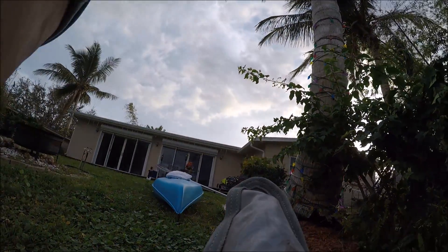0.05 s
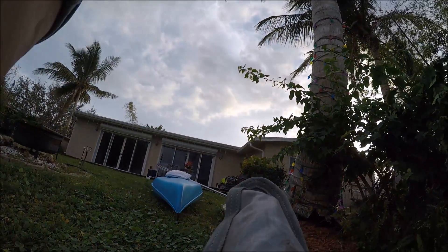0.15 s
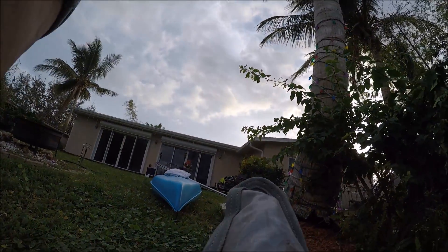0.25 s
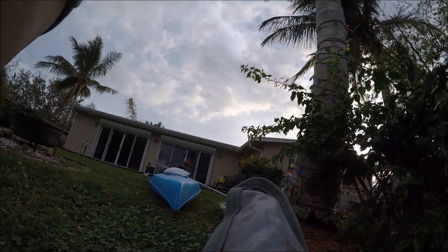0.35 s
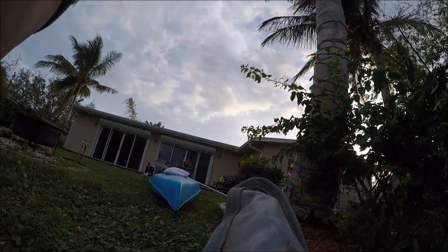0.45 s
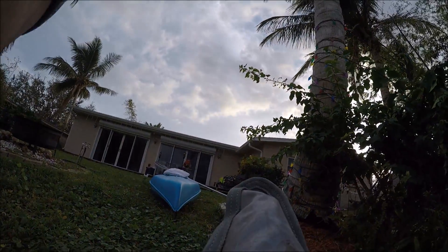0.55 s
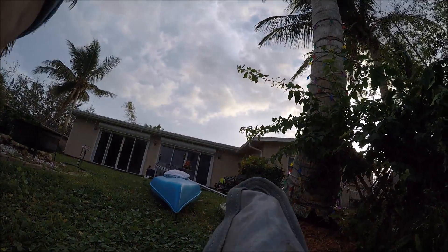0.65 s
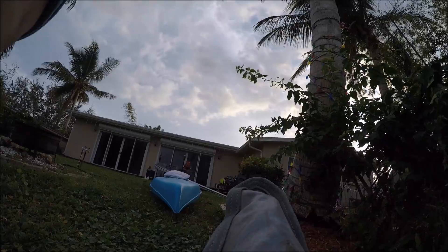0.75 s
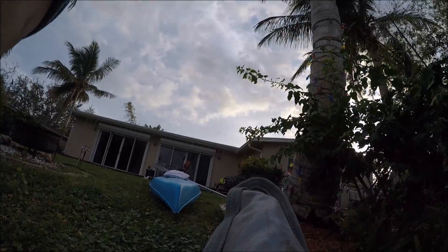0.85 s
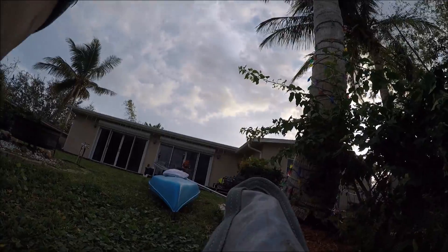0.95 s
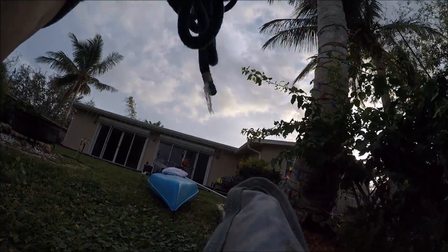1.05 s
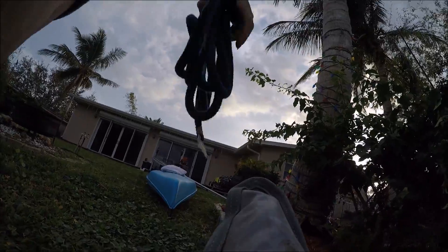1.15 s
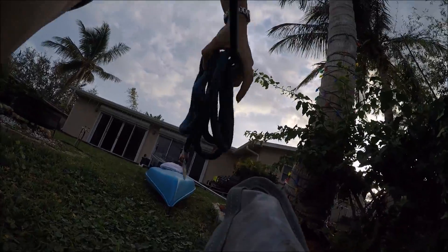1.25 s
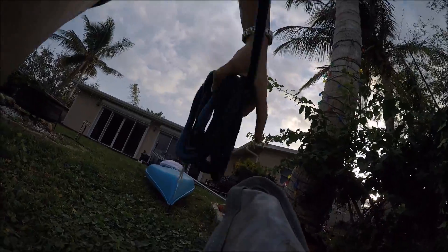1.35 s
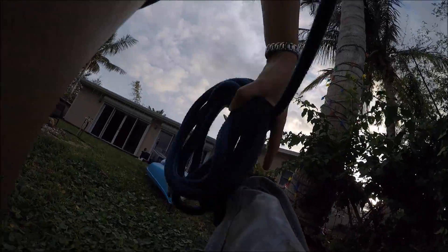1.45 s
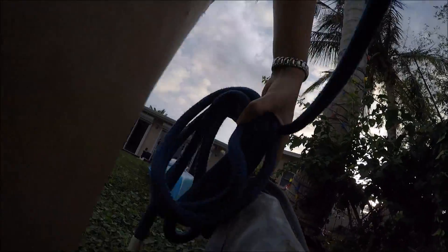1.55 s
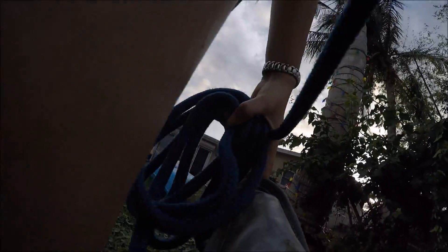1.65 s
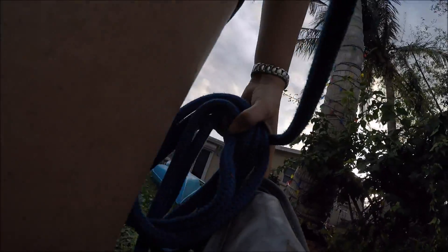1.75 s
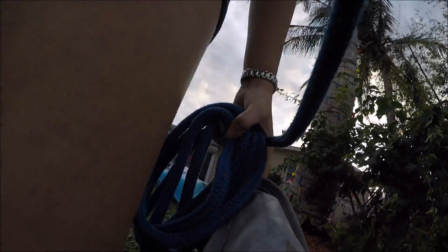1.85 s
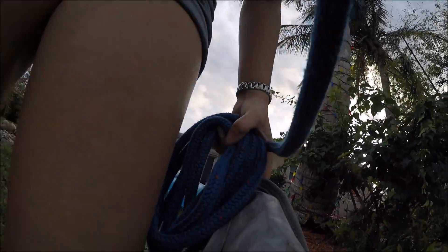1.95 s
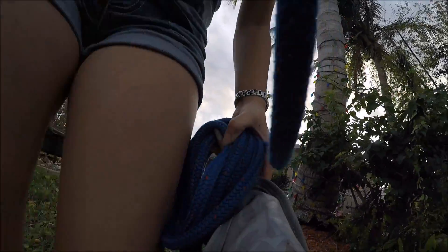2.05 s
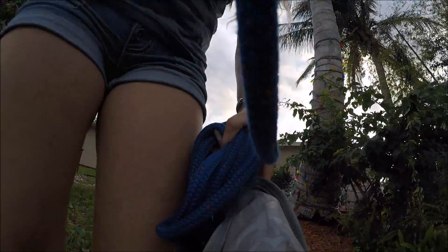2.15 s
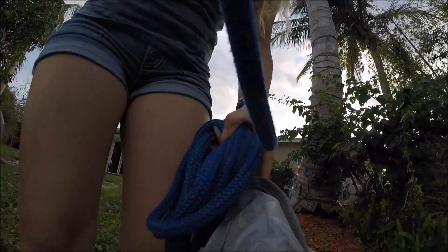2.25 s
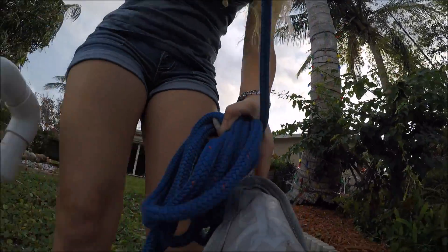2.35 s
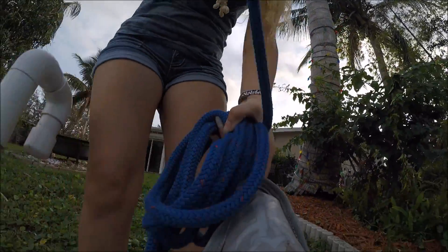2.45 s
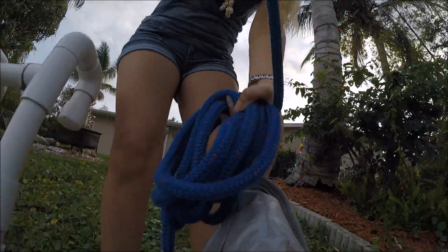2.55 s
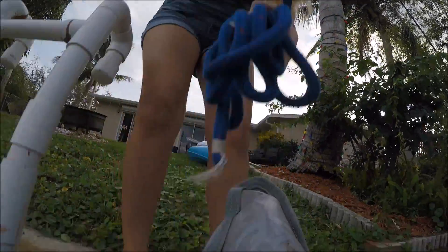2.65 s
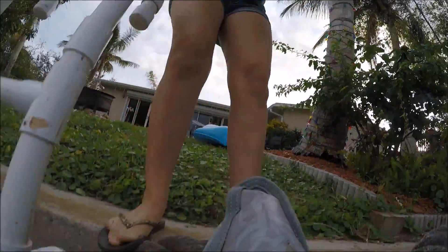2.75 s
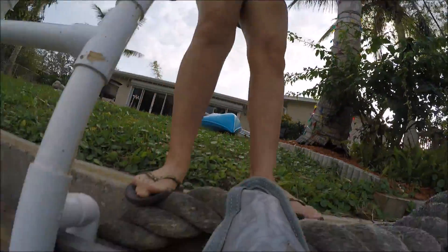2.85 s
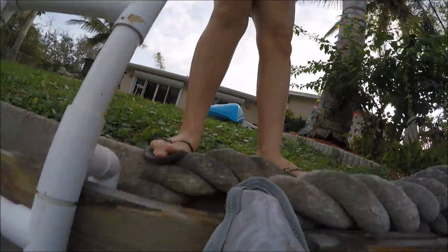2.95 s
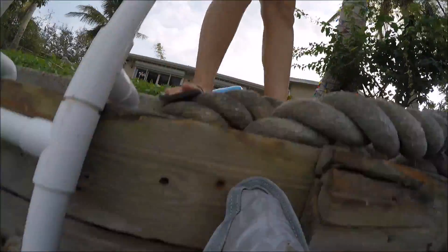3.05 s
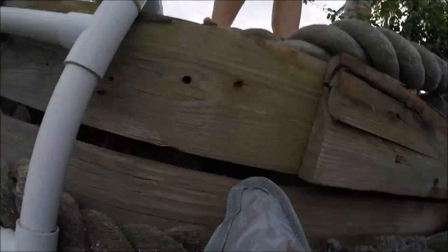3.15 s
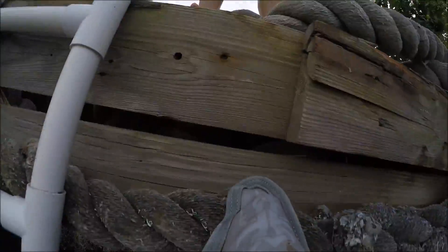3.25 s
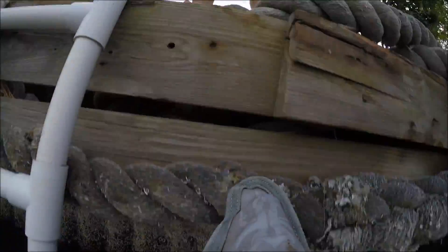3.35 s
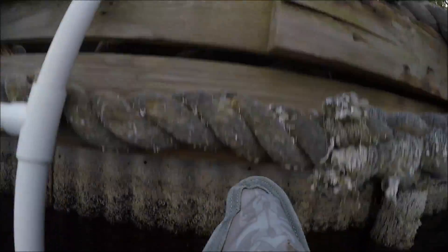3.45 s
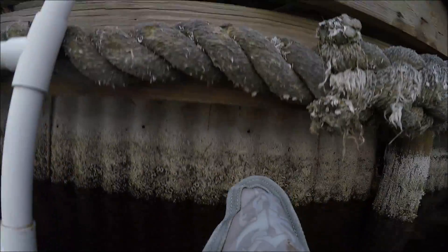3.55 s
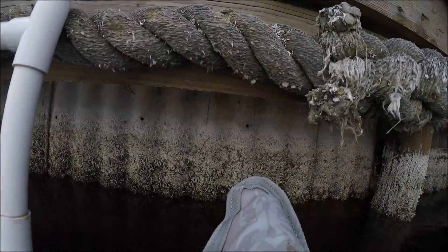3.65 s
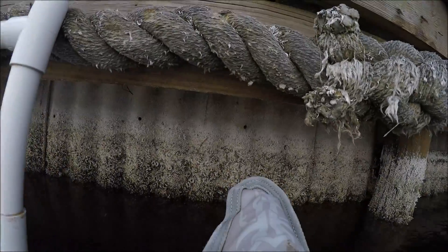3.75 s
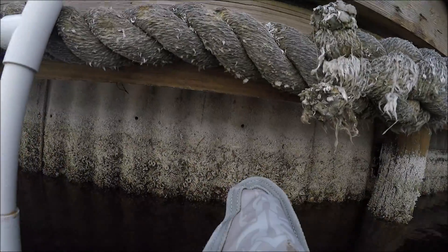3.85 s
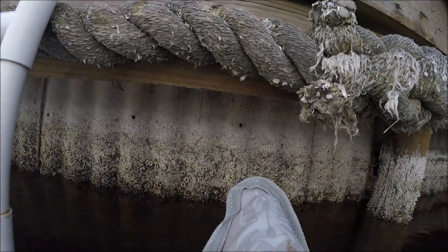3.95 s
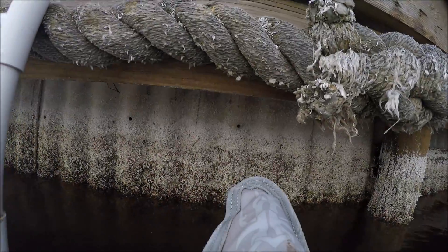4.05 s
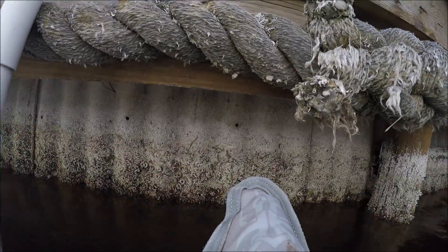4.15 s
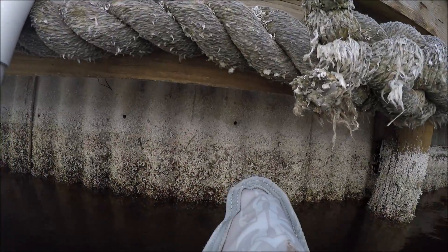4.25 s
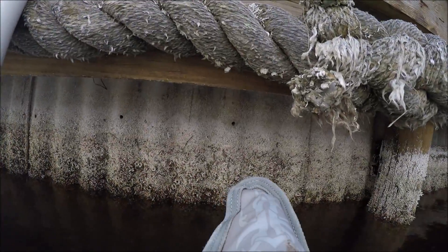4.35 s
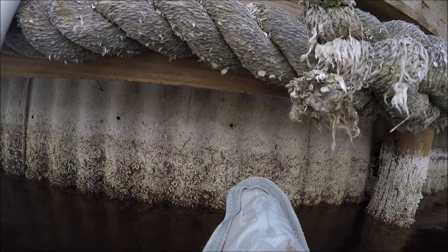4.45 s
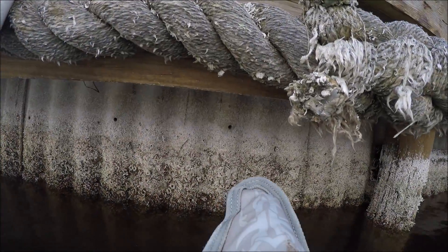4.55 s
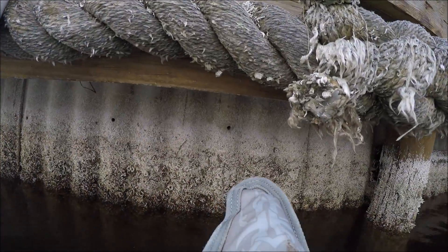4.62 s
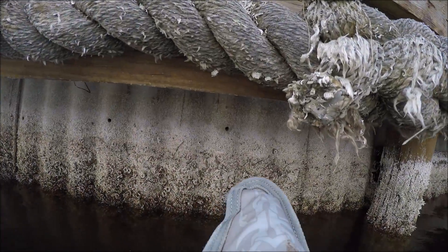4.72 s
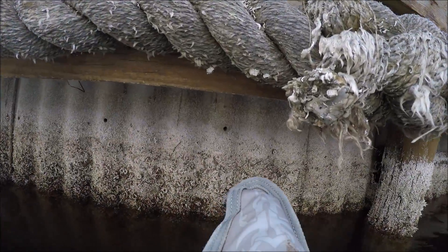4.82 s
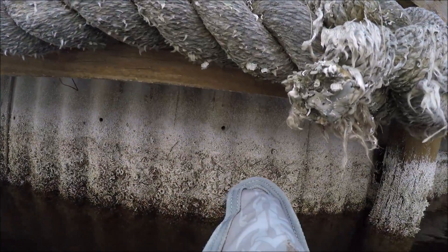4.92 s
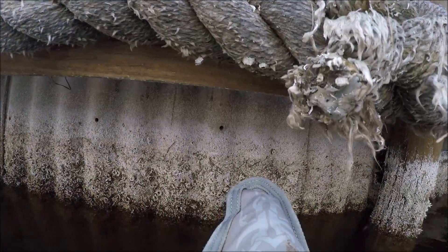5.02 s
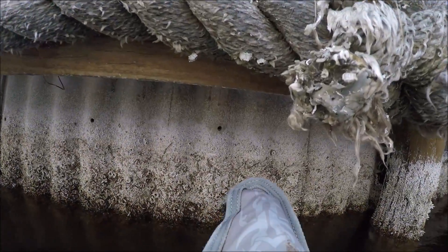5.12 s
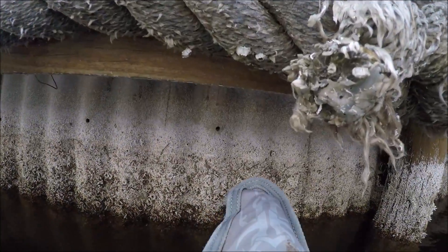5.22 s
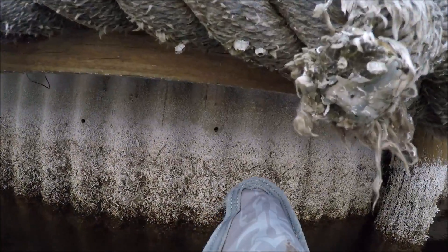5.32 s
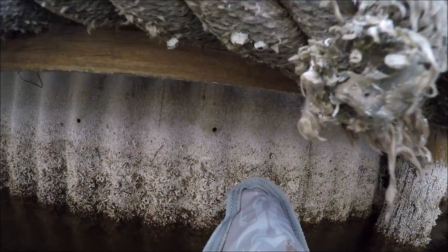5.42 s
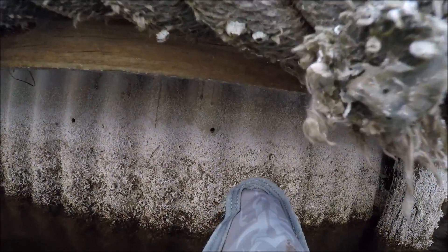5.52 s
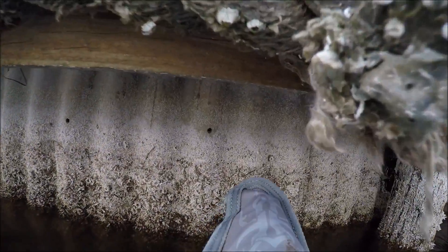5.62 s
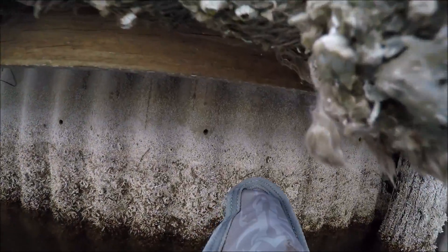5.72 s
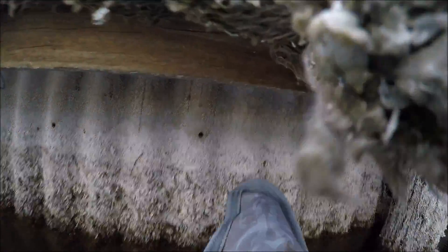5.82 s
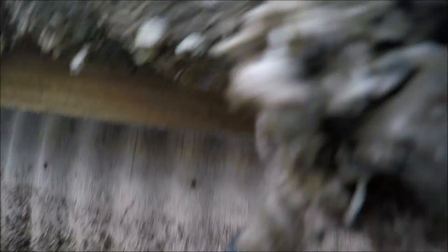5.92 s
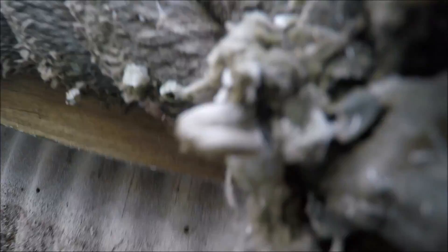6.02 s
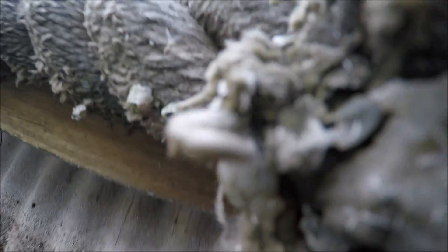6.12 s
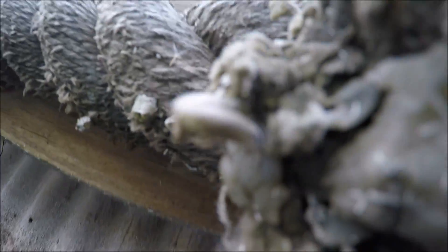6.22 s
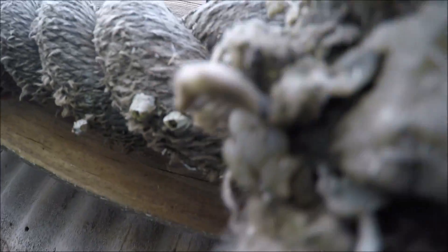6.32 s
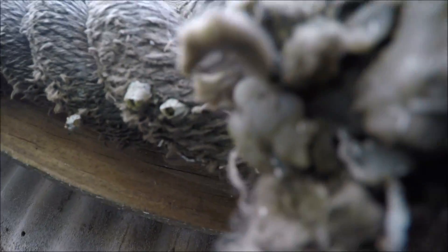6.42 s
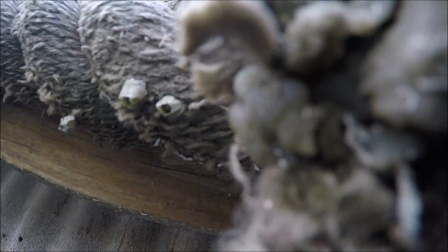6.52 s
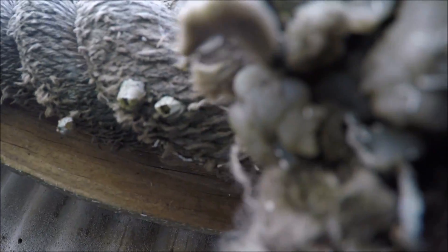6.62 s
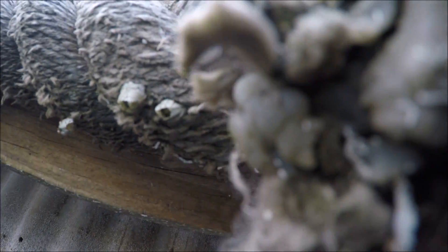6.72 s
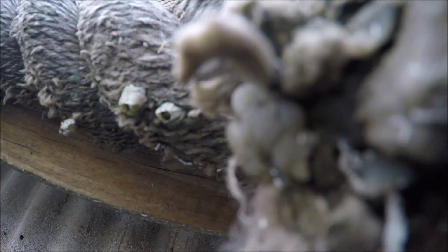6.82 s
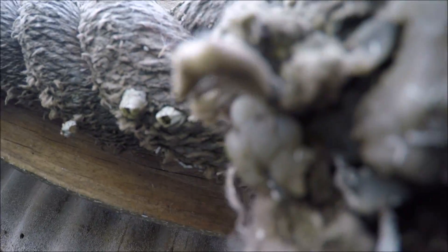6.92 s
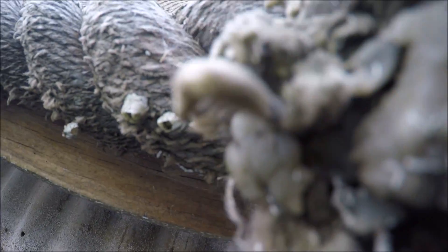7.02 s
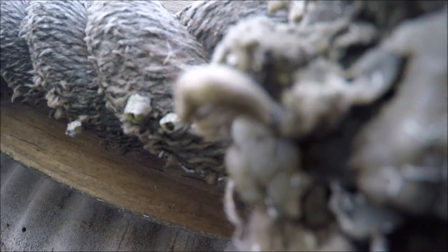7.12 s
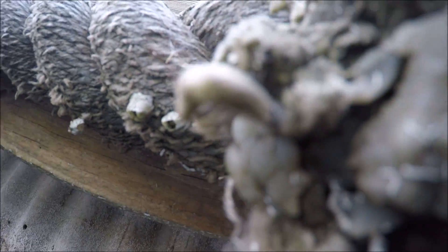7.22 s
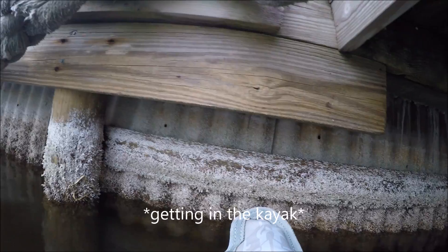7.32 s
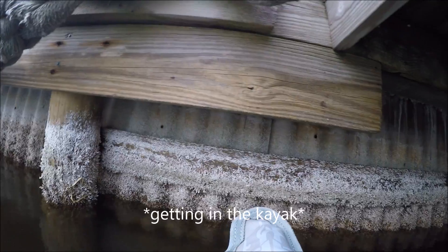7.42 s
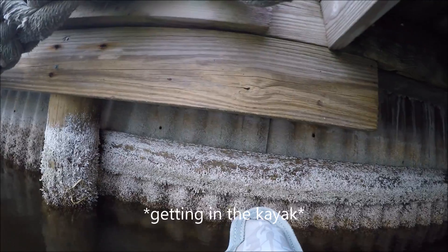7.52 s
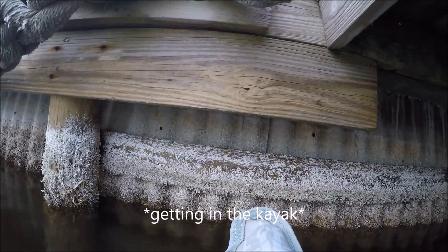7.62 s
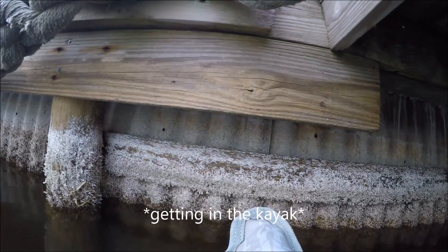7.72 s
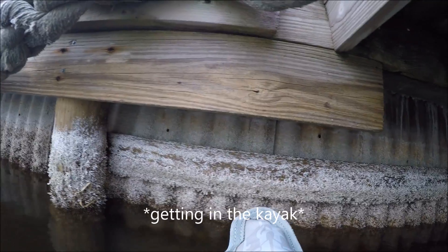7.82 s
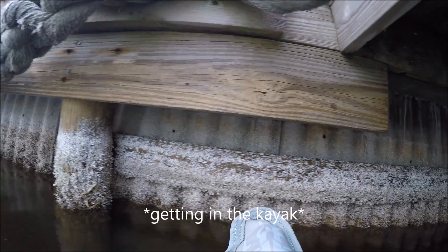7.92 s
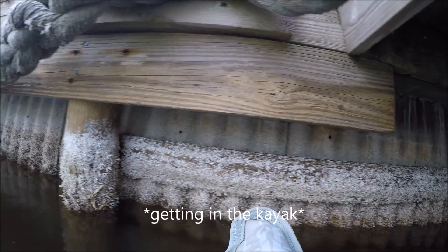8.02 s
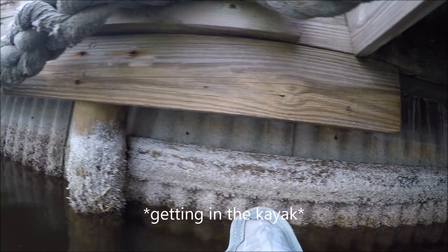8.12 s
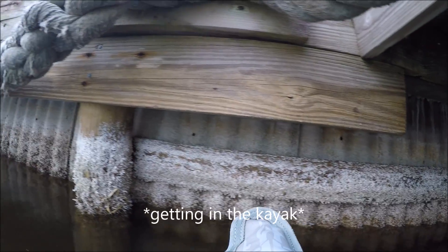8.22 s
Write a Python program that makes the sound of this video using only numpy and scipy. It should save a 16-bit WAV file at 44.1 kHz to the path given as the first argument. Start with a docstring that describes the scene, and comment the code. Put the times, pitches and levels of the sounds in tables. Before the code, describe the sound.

Heard from a camera fixed to a plastic kayak outdoors: faint hiss and low sway, then rope rubbing, hollow thumps, brief groans and squeaks as the hull slides off the bank. A calmer spell brings tiny drips and laps. Then it slams into the dock with heavy booms and sharp clacks, crusted rope and timber scraping the case, before fading to near quiet.

```python
"""A low sway under a quiet hiss comes first; then a plastic kayak slides off a bank and drifts against a wooden dock.
The sound is heard at a camera fixed to its deck: the mount swings, and the hull booms and groans as decaying or
stick-slip tones. Hard contacts clack through the camera's resonant case; rope and crusted timber scrape it as
dense random catches. Ringing bubbles make the few drips and laps, and wet plastic squeaks in rising chirps."""
import sys
import numpy as np
from scipy import signal
from scipy.fft import rfft, irfft
from scipy.io import wavfile

SR = 44100
rng = np.random.default_rng(int(sys.argv[2]) if len(sys.argv) > 2 else 0)


def master(y):
    """Save y as 16-bit WAV."""
    cut = np.clip(np.atleast_2d(y).T, -1, 1)
    pcm = np.round(cut * 32767)  # scale
    wavfile.write(sys.argv[1], SR, pcm.astype(np.int16))


N = 364707
TIME = np.arange(N) / SR   # s
SLOW_TIME = TIME[::20]   # coarse steps suffice for slow pressure changes


def from_db(db):
    """Logarithmic level: decibels to amplitude gain."""
    return 10 ** (np.asarray(db) / 20)


def rms_one(x):
    """Normalization: scale to unit mean power."""
    return x / np.sqrt(np.mean(x ** 2) + 1e-20)


def in_time(rows):
    """Linear interpolation: join the rows of a curve by straight lines."""
    s, *columns = np.transpose(rows)
    return [np.interp(TIME, s, column) for column in columns]


def add(out, s, sound):
    """Superposition: mix a sound in at a given time."""
    start = max(round(s * SR), 0)
    out[start:start + len(sound)] += sound[:N - start]


def band(x, low_hz, high_hz, order=2):
    """Causal band-pass filtering."""
    sos = signal.butter(order, [low_hz, min(high_hz, 0.45 * SR)], "band", fs=SR, output="sos")
    return signal.sosfilt(sos, x)


def coloured(x, spectrum):
    """Spectral shaping: weight a steady sound by a spectrum that falls away past its ends; rms 1."""
    hz, db = np.transpose(spectrum)
    f = np.maximum(np.arange(N // 2 + 1) * SR / N, 1)
    skirts = 1 / (1 + (hz[0] / f) ** 6) / (1 + (f / hz[-1]) ** 6)
    gain = skirts * from_db(np.interp(np.log(f), np.log(hz), db))
    return rms_one(irfft(rfft(x) * gain, N))


def resonate(x, hz, width_hz):
    """Damped resonance: a two-pole mode with gain 1 at its top."""
    r = np.exp(-np.pi * width_hz / SR)
    feed = np.array([1, 0, -1]) * (1 - r * r) / 2
    return signal.lfilter(feed, [1, -2 * r * np.cos(2 * np.pi * hz / SR), r * r], x)


def drift(rate):
    """Slow random fluctuation: interpolated random knots, rate per second, rms 1."""
    knots = rng.standard_normal(int(N / SR * rate) + 2)
    return rms_one(np.interp(TIME * rate, np.arange(len(knots)), knots))


def grains(per_s, spread_db):
    """Random impulse train: tiny catches of a rough surface, of very uneven size; rms 1."""
    sizes = from_db(spread_db * np.minimum(rng.exponential(1, N), 4.5))
    caught = rng.random(N) < per_s / SR
    return rms_one(sizes * rng.standard_normal(N) * caught)


def swell(s, rise_s, fall_s):
    """Loading and release: pressure builds up to a peak of 1 and lets go."""
    shape = 1.48   # 1 = pointed, 2 = bell-shaped
    away = np.abs((SLOW_TIME - s) / np.where(SLOW_TIME < s, rise_s, fall_s))
    return np.exp(-np.minimum(away ** shape, 40))


def strokes(rows):
    """Incoherent addition: gain of a run of strokes whose powers add."""
    power = sum((from_db(db) * swell(s, rise, fall)) ** 2 for s, db, rise, fall, *_ in rows)
    return np.interp(TIME, SLOW_TIME, np.sqrt(power))


def gritty(rows):
    """Proportional excitation: gain of the hard grains that the same strokes drag along."""
    return strokes([(s, db + rel_db, rise, fall) for s, db, rise, fall, rel_db in rows])


def swing(db, hz, rise, t60):
    """Free decay: a low vibration builds up during the push, then dies away exponentially."""
    t = TIME[:SR]
    push = np.sin(np.pi / 2 * np.minimum(t / rise, 1))
    decay = from_db(db - 60 * np.maximum(t - rise, 0) / t60)
    return decay * push * np.sin(2 * np.pi * hz * t)


# resonances of the camera case: pitch_hz, width_hz, level_db
CASE_MODES = [(708, 170, -8.5), (977, 41, -5.5), (1050, 12, -5.5), (1660, 67, 3), (1868, 40, -3),
              (2075, 50, -3), (2275, 210, -4.5), (2496, 51, 1), (2790, 51, -5.5), (3026, 41, -1.5),
              (3400, 20, -8), (4280, 720, 4), (5600, 450, -3), (7610, 85, -7.5)]


def case(x):
    """Modal transmission: vibration reaches the microphone directly and through the ringing case."""
    return 0.7 * x + sum(from_db(db) * resonate(x, hz, width) for hz, width, db in CASE_MODES)


# spectrum of the outdoor hiss: frequency_hz, relative_level_db
AIR_COLOUR = [(200, -1.5), (300, -8.5), (550, -10.5), (1000, -11.5), (1400, -16), (2400, -14.5),
              (3200, -18.5), (5000, -19.5), (8000, -24.5), (12000, -24), (15500, -24)]
# the background dips and recovers: lowest_s, depth_db, sinking_s, recovery_s
AIR_DIPS = [(3.55, 7, 0.17, 0.52), (6.62, 4, 0.25, 0.68)]


def air(level_db=-65):
    """Broadband noise: a quiet outdoor hiss that dips twice."""
    dip_db = sum(db * swell(s, sink, recover) for s, db, sink, recover in AIR_DIPS)
    gain = from_db(level_db - np.interp(TIME, SLOW_TIME, dip_db))
    return gain * coloured(rng.standard_normal(N), AIR_COLOUR)


# how much the boat rocks, before balance: time_s, mount_sway_db, hull_murmur_db
ROCKING = [(0, -42.5, -55.5), (.7, -41.5, -50.5), (.95, -30, -43), (1.25, -39.5, -53.5), (1.6, -36.5, -45),
           (2.0, -31, -59.5), (2.9, -25.5, -30.5), (3.35, -30.5, -44.5), (3.85, -34, -51.5),
           (4.3, -36, -51.5), (5.2, -38, -62), (5.8, -46.5, -59.5), (6.05, -38.5, -37.5), (6.45, -35, -32),
           (6.66, -50, -58), (6.85, -39, -39), (7.25, -35.5, -37.5), (7.5, -42.5, -67.5), (8.27, -62, -65)]
# spectrum of the hull's murmur: frequency_hz, relative_level_db
MURMUR_COLOUR = [(45, 6.5), (70, 7), (120, -4), (150, -4.5), (180, -4), (230, -20), (400, -22.5)]


def rumble(rubbing, scraping, sway_db=1.0, murmur_db=-0.5, rub_drag_db=-11, scrape_drag_db=-23,
           rub_follows=0.69, scrape_follows=0.38, surge_db=3.5, lull_db=3.0):
    """Randomly driven resonance: the mount sways throughout; friction swells the lumpy murmur of the hull."""
    sway, murmur = in_time(ROCKING)
    swaying = signal.hilbert(resonate(rng.standard_normal(N), 33, 3.3))
    evened = swaying.real / np.abs(swaying) ** 0.69   # the swing seldom stalls
    swaying = rms_one(band(evened, 20, 72))
    lumps = coloured(grains(per_s=1500, spread_db=1.2), MURMUR_COLOUR)
    rub_drag = from_db(rub_drag_db) * rubbing ** rub_follows
    scrape_drag = from_db(scrape_drag_db) * scraping ** scrape_follows
    drag = np.hypot(rub_drag, scrape_drag)
    murmuring = np.hypot(from_db(murmur + murmur_db), drag) * from_db(surge_db * drift(25)) * lumps
    return from_db(lull_db * drift(9)) * (from_db(sway + sway_db) * swaying + murmuring)


# jolts that set the camera mount swinging: start_s, height_db, push_s
JOLTS = [(0.343, -14, 0.04), (0.831, -20.5, 0.029), (1.685, -3.5, 0.02), (2.429, -4, 0.033),
         (2.659, -4, 0.045), (2.829, -1.5, .015), (2.904, -6.5, 0.014), (3.11, -3, 0.011),
         (3.215, -2.5, 0.0084), (3.621, -5.5, 0.0055), (3.95, -19, 0.039), (4.221, -23.5, 0.058),
         (5.091, -25, .05)]


def jolts(mount_hz=32.1, mount_t60_s=0.32):
    """Impulse response of an oscillator: each jolt leaves the mount swinging at its own low note."""
    out = np.zeros(N)
    for s, db, push_s in JOLTS:
        add(out, s, swing(db, mount_hz, push_s, mount_t60_s))
    return out


# hard contacts: contact_s, first_5_ms_level_db; before balance: body_over_clack_db, crack_over_clack_db
KNOCKS = [(0.3435, -51.5, 0.5, -3), (1.078, -44.5, -7.5, -6), (1.54, -50, -18, -3), (1.6811, -26, 24, -26),
          (1.686, -37, 5, -16), (2.48, -42.5, 12, -19), (2.677, -26.5, 17, -8), (2.7994, -39, -3, -4),
          (2.825, -30, 10.5, -2), (2.8984, -31, 18, -7), (2.914, -24, -1.5, -7), (3.0695, -38.5, -12, -5.5),
          (3.101, -26.5, 10.5, -11.5), (3.109, -24, 3, -20), (3.1191, -20.5, -2.5, -3),
          (3.137, -27.5, 0.5, -5.5), (3.2117, -28, 5, -10), (3.2293, -25, 2.5, -14), (3.303, -45, -4.5, -4),
          (3.5844, -30.5, -4.5, 1.5), (3.595, -22, 11, -11), (3.611, -29.5, 2, -4), (5.907, -26.5, -7, -8),
          (5.921, -19.5, -11.5, -6), (5.94, -11.5, -6, -20), (5.9445, -15, 11, -19.5),
          (5.9548, -15, 2, -4.5), (6.075, -28.5, 9, -9), (6.167, -27, -2.5, -6), (6.189, -31.5, 4, 2.5),
          (6.21, -27.5, -21, -13), (6.228, -29, 8, -3), (6.432, -26.5, 8.5, -2.5), (6.438, -20, 4.5, -3),
          (7.2273, -44.5, 6, -22)]


def knocks(crunch=0.25, crunch_t60=0.018, lead_noise_db=-9, lead_noise_t60=0.02, tail_db=-30, tail_t60=0.16,
           body_db=3.5, clack_db=1.0, crack_db=-3.5):
    """Impact excitation: a short noise rises just before each sharp knock; a crunch and faint shiver follow."""
    lead, first = SR // 100, SR // 200   # samples: 10 ms before contact, 5 ms after it
    out, t = np.zeros(N), (np.arange(SR // 6) - lead) / SR
    before = from_db(lead_noise_db - 60 * np.abs(t) / lead_noise_t60)
    after = from_db(-60 * np.abs(t) / crunch_t60) + from_db(tail_db - 60 * np.abs(t) / tail_t60)
    noises = rng.standard_normal((len(KNOCKS), len(t)))
    for (s, db, dull, crack), noise in zip(KNOCKS, noises):
        force = (t == 0) + crunch * noise * np.where(t < 0, before, after)
        ringing = case(force)
        # padded contacts favour the wooden body, hard ones the clack and crack of the case
        hollow = resonate(force, 160, 160) + 0.43 * resonate(force, 490, 220)
        body = band(ringing + hollow, 130, 1130, order=3)
        clack = band(ringing, 1330, 2900, order=3)
        sparkle = 0.14 * band(force, 7000, 15000)
        snap = band(band(ringing, 1800, 6600), 3400, 12000, order=3) + sparkle
        shares = from_db([dull + body_db, clack_db, crack + crack_db]) / np.hypot(from_db(dull), 1)
        for part, share in zip((body, clack, snap), shares):
            opening = np.std(part[lead:lead + first])
            add(out, s - lead / SR, from_db(db) * share * part / opening)
    return out


# dull blows on the hull: start_s, height_db, pitch_hz
THUDS = [(.346, -28.5, 86), (.81, -25, 89), (1.07, -38, 176), (1.554, -23, 166), (1.645, -14.5, 38.8),
         (1.682, -10.5, 150.6), (1.682, -21.5, 429), (2.222, -7.5, 45.3), (2.375, -8, 54.5),
         (2.528, -11, 66.3), (2.795, -3.5, 72), (3.02, -15.5, 51.5), (3.118, -16.5, 123),
         (3.415, -13.5, 41.6), (3.595, -13, 144.6), (3.596, -17, 374), (3.596, -4, 49.8),
         (4.33, -35.5, 101), (4.63, -39, 119), (5.224, -25.5, 60.6), (5.909, 4.5, 52), (5.952, 0.5, 70),
         (6.076, -11, 65), (6.234, -7, 36.5), (6.438, 1.5, 83.5), (6.451, -6, 38.8), (6.72, -27, 85),
         (7.233, -11.5, 105), (7.239, -27.5, 184)]


def thuds(rise_cycles=0.45, free_cycles=9.9, pinned_cycles=3.9, pinned_from_s=5.8, pinned_to_s=6.9):
    """Damped modes: the hull booms for a set number of cycles, fewer while the dock holds it."""
    out = np.zeros(N)
    for s, db, hz in THUDS:
        cycles = pinned_cycles if pinned_from_s < s < pinned_to_s else free_cycles   # to fall 60 dB
        add(out, s, swing(db, hz, rise_cycles / hz, cycles / hz))
    return out


# rope and hands rubbing on the boat as it is launched: peak_s, level_db, rise_s, fall_s, relative_sand_db
RUBS = [(.87, -63, 0.043, 0.11, -15), (1.44, -61, 0.17, 0.083, -12), (1.56, -46, 0.01, 0.1, -18),
        (1.68, -45.5, 0.11, 0.14, -20), (1.92, -52.5, .035, 0.043, -17), (2.07, -51.5, 0.068, 0.1, -24),
        (2.24, -51, 0.04, 0.057, -21), (2.327, -41, 0.031, 0.036, -26), (2.415, -36, 0.013, 0.033, -18.5),
        (2.59, -47.5, 0.018, .03, -27), (2.66, -31.5, 0.044, 0.02, -27),
        (2.832, -33.5, 0.014, 0.023, -16.5), (2.897, -35, 0.021, 0.05, -20.5), (3.0, -48, .07, 0.1, -24.5),
        (3.23, -40.5, 0.031, .045, -16), (3.61, -45.5, 0.027, 0.038, -14)]
# spectrum of the rubbing: frequency_hz, relative_level_db
RUB_COLOUR = [(150, -38.5), (250, 2), (407, -3), (561, 4.5), (799, 3), (1440, -2), (1650, -1), (2020, 2),
              (2230, -4), (3130, -8.5), (3400, -17), (4230, -21.5), (5270, -37), (14000, -55)]


def rub(pressure, rub_db=0.0, uneven_db=1.74, sparkle_db=-13):
    """Dry friction: fibres catch densely under fluttering pressure; fine sand crackles between them."""
    catches = case(grains(per_s=4000, spread_db=3.2))
    specks = grains(per_s=1200, spread_db=3.2)
    sparkle = from_db(sparkle_db) * rms_one(band(specks, 7500, 14000))
    sand = rms_one(band(specks, 3500, 5770, order=3)) + sparkle
    flutter = from_db(rub_db + uneven_db * drift(120))
    return flutter * (pressure * coloured(catches, RUB_COLOUR) + gritty(RUBS) * sand)


# the hull judders over the edge, one row per shove: start_s, length_s, top_slip_rate_hz, top_speed_level_db
GROANS = [(2.315, 0.07, 134, -14), (2.405, 0.039, 148, -22.5), (2.709, .105, 150, -15)]


def groan(slowest_hz=70, overtone_db=-32, waver=0.031, slow_gain=1.7, fade=0.71):
    """Stick-slip: a low, nearly pure tone follows each shove's speed; slower slips gain width, ends fade."""
    out, wander = np.zeros(N), 1 + waver * drift(60)
    for s, length, top_hz, db in GROANS:
        speed = np.abs(np.sin(np.linspace(0, np.pi, round(length * SR))))
        hz = slowest_hz + (top_hz - slowest_hz) * speed
        phase = 2 * np.pi * np.cumsum(hz * wander[round(s * SR):][:len(hz)]) / SR
        width = from_db(db) * speed ** fade * (top_hz / hz) ** slow_gain
        add(out, s, width * (np.sin(phase) + from_db(overtone_db) * np.sin(2 * phase)))
    return out


# wet plastic squeaking on the edge: start_s, length_s, first_pitch_hz, last_pitch_hz, level_db
SQUEAKS = [(2.916, 0.049, 1570, 1820, -36), (2.978, 0.03, 1704, 1770, -42.5),
           (3.013, .057, 1790, 2430, -43)]


def squeaks(jitter=0.007, upper_db=-7):
    """Stick-slip harmonics: in quick rising chirps two neighbouring overtones of the slipping stand out."""
    out, waver = np.zeros(N), 1 + jitter * drift(900)
    for s, length, first_hz, last_hz, db in SQUEAKS:
        along = np.linspace(0, 1, round(length * SR))
        hz = first_hz + (last_hz - first_hz) * along
        phase = 2 * np.pi * np.cumsum(hz * waver[:len(along)]) / SR
        overtone = np.sin(phase * 6 / 5)   # sixth beside fifth harmonic
        envelope = from_db(db) * np.sin(np.pi * along) ** 0.5
        add(out, s, envelope * (np.sin(phase) + from_db(upper_db) * overtone))
    return out


# small waves against the hull: peak_s, level_db before balance, half_length_s
LAPS = [(3.433, -60, 0.014), (3.91, -63, 0.045), (3.992, -56, 0.047), (4.264, -58.5, 0.016),
        (4.548, -62.5, .04), (4.718, -63.5, 0.029), (5.046, -74.5, 0.16), (5.438, -71, 0.035)]
# drips and small bubbles beside the hull: start_s, level_db, starting_pitch_hz
DRIPS = [(3.838, -56, 2230), (3.842, -52, 1220), (3.882, -53, 1140), (3.897, -52, 2820), (3.913, -51, 2300),
         (3.935, -55, 4540), (3.953, -47, 1060), (3.978, -66, 4600), (4.008, -48, 1150), (4.067, -47, 1550),
         (4.068, -59, 5850), (4.186, -52.5, 2340), (4.25, -53, 2550), (4.263, -45, 1050),
         (4.307, -55, 2660), (4.403, -44.5, 2370)]


def water(ring_t60=0.024, climb=4.7, splash=0.48, lap_db=-2.0):
    """Bubble resonance: bubbles ring briefly and rise in pitch; small waves shed a patter of tiny ones."""
    out, t = np.zeros(N), TIME[:SR // 12]
    noises = rng.standard_normal((len(DRIPS), len(t)))
    for (s, db, hz), noise in zip(DRIPS, noises):
        tone = np.sin(2 * np.pi * hz * t * (1 + climb * t))
        bubble = tone + splash * band(noise, hz / 2, hz * 2)
        add(out, s, from_db(db - 60 * t / ring_t60) * bubble)
    pitches = np.geomspace(650, 4800, num=14)
    patter = rms_one(sum(resonate(grains(per_s=160, spread_db=3.5), hz, hz / 9) / hz for hz in pitches))
    waves = sum(from_db(db + lap_db) * np.exp(-((TIME - s) / length) ** 2) for s, db, length in LAPS)
    return out + patter * waves


# crusted rope and timber passing over the case, before balance: peak_s, level_db, rise_s, fall_s, relative_grit_db
SCRAPES = [(5.893, -35.5, .004, 0.11, -5.5), (6.02, -49, 0.048, 0.14, -3.5), (6.272, -35, 0.016, 0.033, -2),
           (6.38, -34.5, 0.056, 0.037, -7), (6.48, -47, .07, .085, -8.5), (6.76, -61, 0.031, 0.28, -2),
           (7.03, -54, 0.2, 0.17, -6.5), (7.13, -43, 0.064, 0.05, -11.5), (7.245, -51.5, .018, 0.043, -8),
           (7.33, -60, .05, .04, -16)]
# spectrum of the rasp: frequency_hz, relative_level_db
SCRAPE_COLOUR = [(170, -4), (300, 6.5), (480, -3), (690, 2.5), (1300, -3.5), (1750, -1.5), (2100, -5.5),
                 (2550, -2), (3300, -11), (4300, -22)]
# spectrum of the grit: frequency_hz, relative_level_db
GRIT_COLOUR = [(3600, 1.5), (4300, -9), (5050, -9.5), (5700, -6), (7400, -13), (9000, -15.5), (11000, -19),
               (14000, -13.5), (15500, -31)]


def scrape(pressure, scrape_db=2.0, grit_db=-2.0, uneven_db=1.0):
    """Roughness excitation: rough timber sets the case ringing; sharp crust adds grit."""
    catches = case(grains(per_s=3000, spread_db=3.6))
    rasp = pressure * from_db(scrape_db) * coloured(catches, SCRAPE_COLOUR)
    crust = gritty(SCRAPES) * from_db(grit_db) * coloured(catches, GRIT_COLOUR)
    return from_db(uneven_db * drift(130)) * (rasp + crust)


# crust dragging hard on the case: time_s, level_db of the case's ringing
CHATTER = [(7.085, -58), (7.102, -40.5), (7.145, -44.5), (7.165, -51), (7.2, -58)]


def chatter(timber_hz=670, timber_width_hz=80, timber_db=-5, rasp_hz=2400, rasp_width_hz=500, rasp_db=-4):
    """Irregular stick-slip: under pressure the case and the timber ring on every uneven slip."""
    db, = in_time(CHATTER)
    slips = grains(per_s=900, spread_db=1.5)
    low_modes = [mode for mode in CASE_MODES if mode[0] < 3100]
    ringing = sum(from_db(mode_db) * resonate(slips, hz, width) for hz, width, mode_db in low_modes)
    timber = from_db(timber_db) * rms_one(resonate(slips, timber_hz, timber_width_hz))
    twice = resonate(resonate(slips, rasp_hz, rasp_width_hz), rasp_hz, rasp_width_hz)
    rasp = from_db(rasp_db) * rms_one(twice)
    pressed = (TIME > CHATTER[0][0]) & (TIME < CHATTER[-1][0])
    return pressed * from_db(db) * (rms_one(ringing) + timber + rasp)


def scene():
    """Superposition of boat, dock and water over quiet outdoor air."""
    rubbing, scraping = strokes(RUBS), strokes(SCRAPES)
    hull = rumble(rubbing, scraping) + jolts() + thuds() + groan()
    friction = rub(rubbing) + squeaks() + scrape(scraping) + chatter()
    return (air() + hull + knocks() + friction + water())[None]


def record(dry, top=0.83, cutoff_hz=15600):
    """Band-limited, saturating microphone: no steady pressure, largest swings rounded, top treble cut."""
    moving = signal.sosfilt(signal.butter(1, 6, "high", fs=SR, output="sos"), dry)
    rounded = moving / (1 + (moving / top) ** 8) ** (1 / 8)
    return signal.sosfilt(signal.ellip(10, 0.1, 90, cutoff_hz, fs=SR, output="sos"), rounded)


dry = scene()
out = record(dry)
master(out)
```